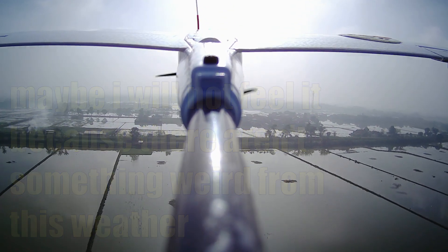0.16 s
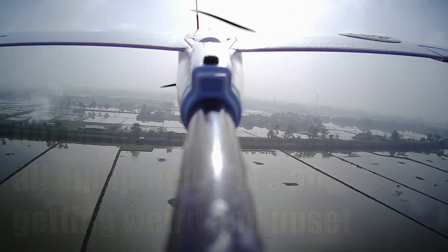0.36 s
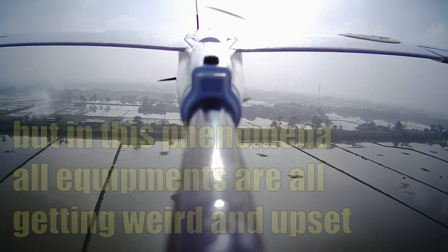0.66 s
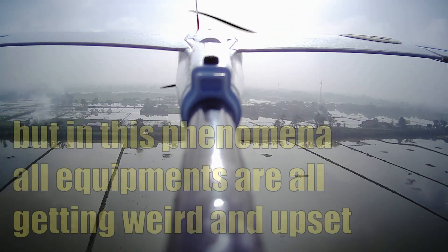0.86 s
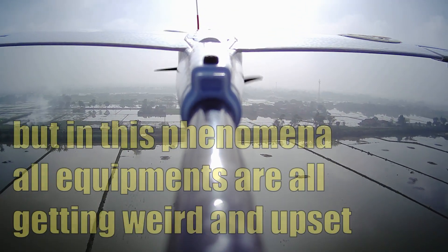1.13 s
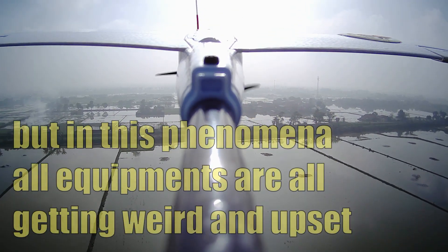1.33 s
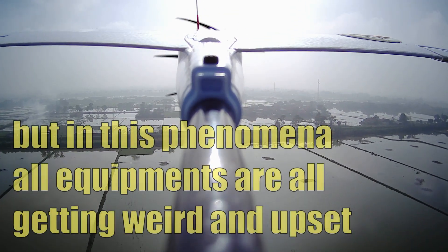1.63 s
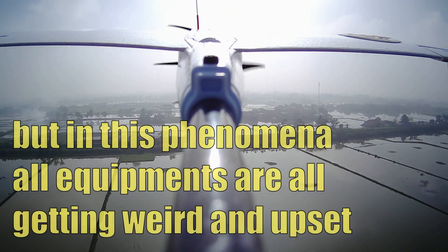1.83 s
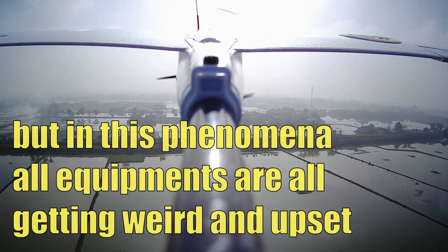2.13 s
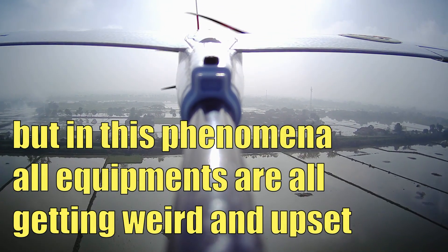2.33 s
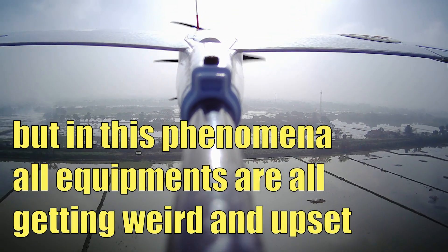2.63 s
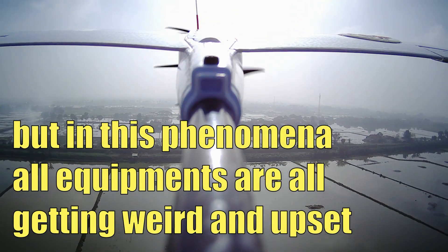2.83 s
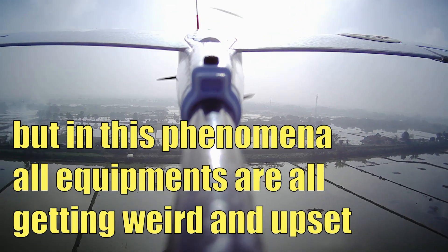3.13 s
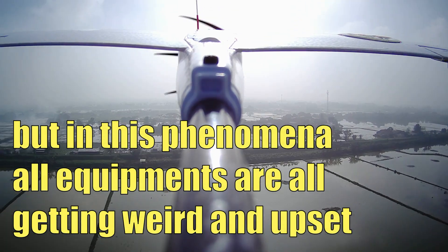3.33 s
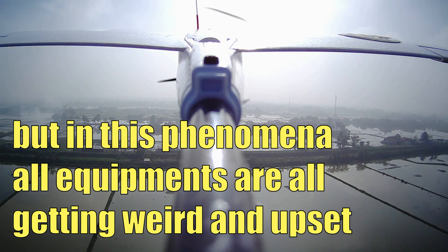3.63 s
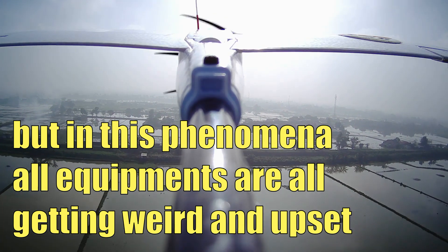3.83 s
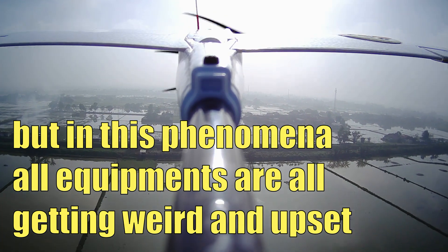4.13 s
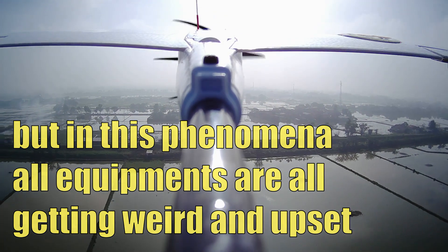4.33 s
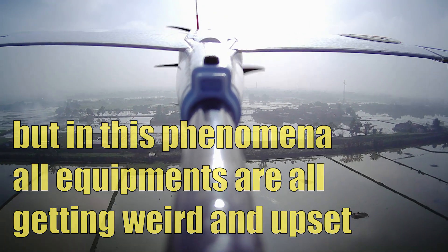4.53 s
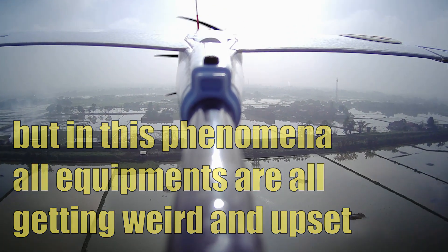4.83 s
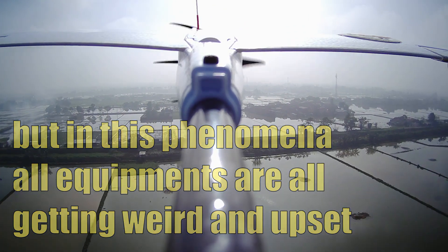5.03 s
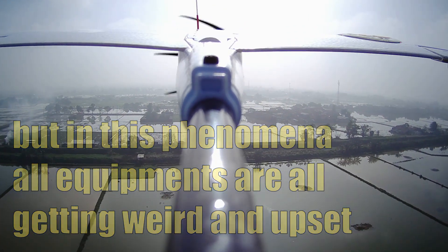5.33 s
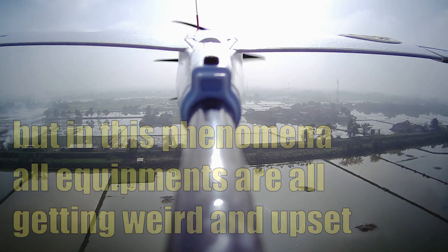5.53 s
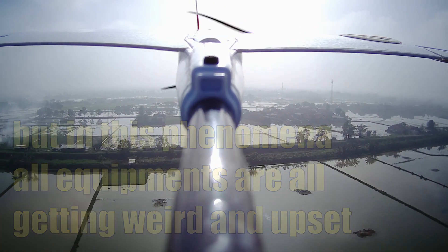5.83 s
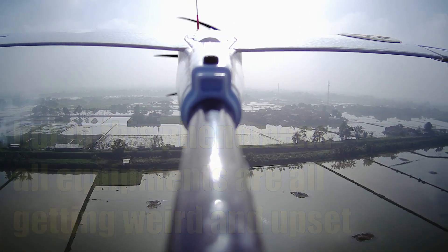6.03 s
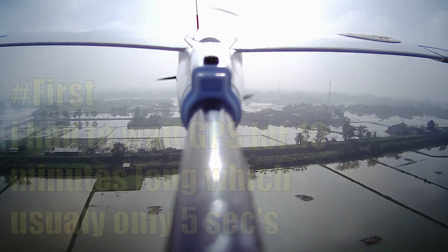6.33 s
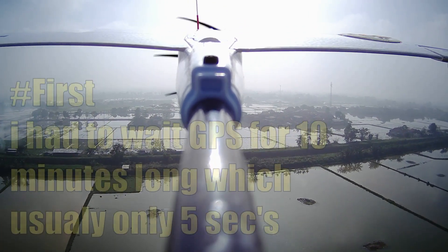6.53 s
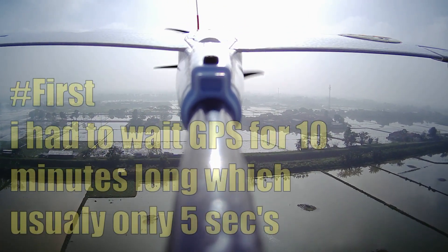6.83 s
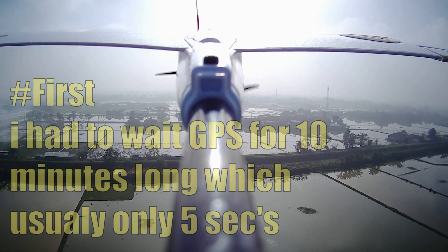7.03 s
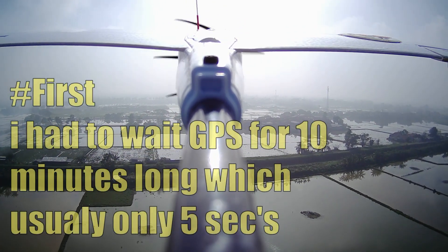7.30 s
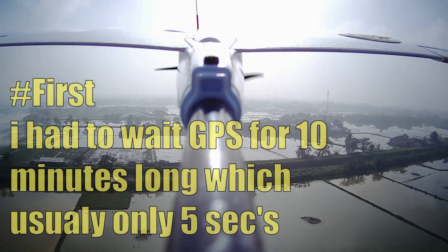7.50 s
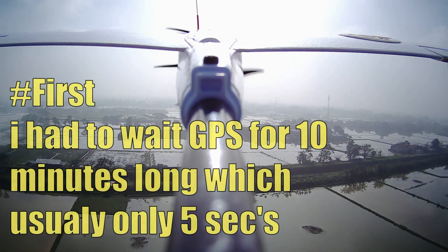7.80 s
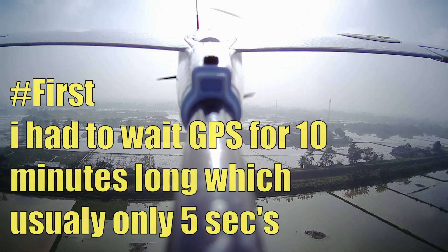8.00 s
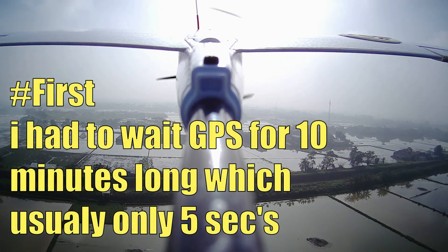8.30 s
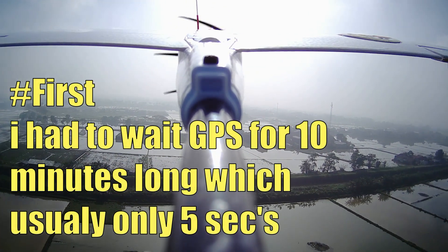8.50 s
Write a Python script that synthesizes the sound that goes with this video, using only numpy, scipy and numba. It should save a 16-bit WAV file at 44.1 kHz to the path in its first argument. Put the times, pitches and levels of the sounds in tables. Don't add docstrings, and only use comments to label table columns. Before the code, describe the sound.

Wind pours continuously over a small microphone fixed to the tail of an electric model aircraft in level flight. The rush is low-mid and muffled, fluttering unevenly, with irregular dull thumps and a few tiny cracks. Beneath it a faint motor hums and whines steadily, rising very slightly near the end. A thin treble hiss and a very high whistle stay in the background, with one small tick just past the middle.

```python
import sys
import numpy as np
from scipy import signal
from scipy.fft import rfft, irfft
from scipy.io import wavfile
from scipy.ndimage import uniform_filter1d
from numba import njit

SR = 44100
rng = np.random.default_rng(int(sys.argv[2]) if len(sys.argv) > 2 else 0)


def to_wav(s):
    ch = np.atleast_2d(s).T
    pcm = np.round(np.clip(ch, -1, 1) * 32767)
    wavfile.write(sys.argv[1], SR, pcm.astype(np.int16))


def level_to_linear(level):
    exponent = np.asarray(level, float) / 20
    return 10 ** exponent


N = 381906

# (frequency [Hz], level [dB])
WIND_COLOUR = [(15, -55), (25, -38), (113, -14.5), (141, -11), (176, -7.5), (293, 0), (427, 1), (521, -1),
               (1110, -14), (1480, -19), (1610, -19.5), (1730, -16.5), (2110, -17.5), (3070, -38.5),
               (5000, -55), (6500, -67), (11000, -120)]
# (time [s], rush level [dB])
AIRFLOW = [(0, -42.5), (.65, -41.5), (1.4, -40.5), (2.1, -39), (2.7, -40.5), (3.6, -41), (4.1, -40.5),
           (4.5, -42), (5.3, -41), (6.3, -40.5), (6.9, -40), (7.6, -40.5), (8.66, -40)]
# (time [s], tug peak [dB], push +1 or suction -1, swell of the rush [dB])
BIG_EDDIES = [(0.0963, -29.4, -1, 5), (0.1798, -23, -1, 2.5), (0.5592, -25, -1, 4.5), (0.5794, -31, -1, 2),
              (0.7207, -23, 1, -2.5), (0.946, -27, -1, .3), (1.0014, -26, -1, 2.5), (2.246, -31, -1, 2),
              (2.75, -27, -1, 1.8), (2.8955, -25, -1, 3), (2.9909, -20, 1, -0.5), (3.2027, -25, -1, 3),
              (3.286, -34, -1, 4), (4.1234, -28, -1, 2.5), (4.6854, -31, -1, 4), (4.807, -24, -1, 4),
              (4.8754, -28, -1, 3.5), (5.4053, -20, -1, 1.5), (5.5507, -28.2, -1, 2.5),
              (6.0017, -26, -1, 1), (6.0939, -23, 1, -1), (6.36, -27, 1, 1.5), (6.6827, -20, -1, 1),
              (6.9521, -19, -1, 2), (7.1093, -21, 1, 1), (7.4263, -22, -1, 2.5), (7.6808, -19, -1, 1.8),
              (8.1017, -26, -1, 2.5), (8.1687, -28.1, 1, 1.5), (8.3636, -29.7, 1, 1)]
# (time [s], change [dB])
WAKE_SWINGS = [(.065, -6.5), (.51, -0.5), (2.31, -5.5), (2.58, -0.5), (2.84, -2.5), (3.26, -4.5),
               (3.5, 0.5), (4.51, -6), (4.85, -1), (5.11, -2), (5.45, -3.5), (5.572, -4.5), (5.72, 2),
               (5.77, -2.5), (6.51, 0.5), (6.73, 1), (6.82, -5), (7.16, -4), (7.2, 2), (7.24, -5),
               (7.31, 2), (7.55, 1.5), (7.65, -3.5), (8.27, -3.5), (8.64, 0.5)]
# (time [s], change [dB], length [s])
EDGE_FLURRIES = [(.42, 3, .04), (.7, 3, 0.045), (.91, 1.7, 0.11), (1.33, -0.2, .06), (1.6, 1.5, .06),
                 (2.665, 2.5, .06), (3.21, 1, .04), (4.32, -2.5, 0.054), (4.5, 3.5, 0.17), (5, -1, .1),
                 (5.48, 1, 0.17), (5.9, 0.3, 0.084), (6.72, 1.3, 0.21), (7, -2.5, .03), (7.04, 2, 0.013),
                 (7.12, 4.5, 0.021), (7.72, 2, 0.062), (7.89, 1.8, .04), (7.98, 2, 0.023), (8.2, 2, 0.16)]
# (time [s], peak level [dB])
PORT_SNAPS = [
    (0.109, -34),
    (0.677, -42),
    (1.5697, -44),
    (6.1548, -51),
    (6.8427, -49),
    (7.4323, -38),
]
# (time [s], shaft speed [turns per s])
THROTTLE_MOVES = [
    (0, 146.93),
    (1.33, 149.33),
    (3.31, 146.6),
    (3.9, 146.87),
    (6.32, 149.35),
    (7.1, 151.55),
]
LINE_MULTIPLES = [1, 10.64, 10.73, 11, 12, 13, 16, 18.55, 42, 84]
# (rms level [dB], blur [Hz])
MOTOR_LINES = [(-56, 1.43), (-74, 4.2), (-66, 4.99), (-60, 1), (-82, 1.4), (-66, 6), (-78.5, 3), (-82, 25),
               (-87, 4), (-99, 4.6)]
# (frequency [Hz], width [Hz], rms level [dB], wander [Hz])
SHELL_RINGS = [(6124, 340, -71, 5), (7130, 60, -82.5, 32), (9700, 980, -75, 5), (10870, 430, -75, 5),
               (11900, 120, -95, 5), (12200, 150, -92, 5), (13000, 900, -83, 5)]
# (frequency [Hz], level [dB])
HISS_COLOUR = [(2500, 1.5), (4200, -0.5), (8000, -1.5), (12500, 0), (14200, 1), (15000, -2), (15700, -11)]
# (multiple of the picture rate, rms level [dB])
WHISTLE_TONES = [(-1, -95), (0, -71.5), (1, -85.5), (2, -92), (3, -96), (4, -97), (5, -97), (6, -99),
                 (7, -99), (8, -100), (10, -100), (12, -103), (-22, -99), (-24, -100), (-25, -99),
                 (9, -101), (14, -101), (15, -101), (16, -102)]

RUMBLE_DB, HISS_DB = -51.5, -69
PORT_DB, EDGE_DB = -56, -56
FOLLOW = 0.37
SWELL_S, WAKE_S = 0.026, 0.016
SPOOL_S, STICK_S = 0.075, 0.2
LOAD_DB_PER_HZ = 0.5
WHISTLE_HZ, PICTURE_HZ = 13366.9, 59.94
GAP_S, GAP_DB = 5.1283, -33.8


def level(x, db):
    return x * level_to_linear(db) / np.sqrt(np.mean(x ** 2))


def steady(x, db, span_s=0.057):
    k = int(span_s * SR)
    power = uniform_filter1d(uniform_filter1d(x ** 2, k), k)
    return x * level_to_linear(db) / np.sqrt(power)


def curve(table):
    s, *columns = np.transpose(table)
    return [np.interp(np.arange(N) / SR, s, c) for c in columns]


def walk(rate):
    k = max(int(SR / rate), 1)
    held = np.repeat(rng.standard_normal(N)[:N // k + 1], k)
    smooth = uniform_filter1d(uniform_filter1d(held, k), k)[:N]
    return smooth / np.std(smooth)


def bumps(rows):
    t = np.arange(N) / SR
    return sum(db * np.exp(-((t - at) / max(length, .005)) ** 2) for at, db, length in rows)


def colour(x, points):
    log_hz = np.log(np.arange(N // 2 + 1) * SR / N + 1)
    hz, db = np.transpose(points)
    return irfft(rfft(x) * level_to_linear(np.interp(log_hz, np.log(hz), db)), N)


@njit
def resonator(x, hz, width):
    y, b, l = np.empty(len(x)), 0., 0.
    for i in range(len(x)):
        g, k = np.tan(np.pi * hz[i] / SR), width / hz[i]
        v = (b + g * (x[i] - l)) / (1 + g * (g + k))
        b, l, y[i] = 2 * v - b, l + 2 * g * v, k * v
    return y


def gusts():
    flow = curve(AIRFLOW)[0]
    swells = [(at, swell, SWELL_S) for at, _, _, swell in BIG_EDDIES]
    swings = [(at, db, WAKE_S) for at, db in WAKE_SWINGS]
    rush = flow + bumps(swells + swings) + .3 * walk(rate=30.)
    bright = FOLLOW * (flow + 41) + bumps(EDGE_FLURRIES)
    port = PORT_DB + bright + 0.53 * walk(rate=28.)
    edge = EDGE_DB + bright + 0.78 * walk(rate=32.)
    return rush, port, edge


def wind(rush_db, port_db, edge_db):
    burst = walk(rate=260.)
    large = rng.standard_normal(N) * level_to_linear(0.97 * burst + 0.21 * walk(rate=22.))
    middle = rng.standard_normal(N) * level_to_linear(1.35 * burst + 0.54 * walk(rate=100.))
    small = rng.standard_normal(N) * level_to_linear(1.5 * burst + 0.8 * walk(rate=150.) + 0.35 * walk(rate=25.))

    rumble = colour(colour(rng.standard_normal(N), WIND_COLOUR), [(170, -7.5), (230, -16), (300, -75)])
    rush = colour(colour(large, WIND_COLOUR),
                  [(120, -76), (170, -16), (215, -1.5), (880, -2.5), (1100, -8.5), (1600, -68)])
    port = colour(colour(middle, WIND_COLOUR),
                  [(650, -67), (850, -21.5), (1030, -9), (1600, -3.5), (1850, -31), (2400, -70)])
    edge = colour(colour(small, WIND_COLOUR), [(1100, -74), (1450, -20), (1680, -8)])

    out = level(rumble, RUMBLE_DB) + steady(rush, rush_db - 0.84)
    return out + steady(port, port_db + 1.25) + steady(edge, edge_db + .3)


def slaps():
    tugs = (rng.random(N) < 120 / SR) * (rng.standard_normal(N) - .9) * level_to_linear(-39.5)
    tugs += (rng.random(N) < 4.5 / SR) * np.sign(rng.random(N) - .7) * level_to_linear(-35.5)
    for at, db, side, _ in BIG_EDDIES:
        tugs[int(at * SR)] = np.sign(side) * level_to_linear(db - 5)
    duller = [(800, -1), (1500, -5), (4000, 0)]
    one_tug_peak = colour(colour(np.arange(N) == 0, WIND_COLOUR), duller)[0]
    return colour(colour(tugs, WIND_COLOUR), duller) / one_tug_peak


def snaps():
    out, s = np.zeros(N), np.arange(400) / SR
    ring = np.sin(2 * np.pi * 2000 * s) * (1 - np.exp(-s / .00015)) * np.exp(-s / 0.00096)
    for at, db in PORT_SNAPS:
        out[int((at + .0016) * SR):][:400] += level_to_linear(db) * ring
    return out


def shaft():
    s, hz = np.transpose(THROTTLE_MOVES)
    setting = np.searchsorted(s, np.arange(N) / SR, side="right") - 1
    wanted = uniform_filter1d(hz[setting] - hz[0], int(STICK_S * SR))
    keep = np.exp(-1 / (SPOOL_S * SR))
    speed = hz[0] + signal.lfilter([1 - keep], [1, -keep], wanted)
    return np.cumsum(speed) / SR


def motor(turns):
    out = 0
    load_db = LOAD_DB_PER_HZ * (np.gradient(turns) * SR - THROTTLE_MOVES[1][1])
    for multiple, (db, blur_hz) in zip(LINE_MULTIPLES, MOTOR_LINES):
        drift = np.cumsum(blur_hz * walk(rate=25.)) / SR
        is_bearing = multiple % 1 > 0
        sway_db = 0.85 * walk(rate=6.) + load_db * is_bearing
        out = out + level(np.sin(2 * np.pi * (multiple * turns + drift)) * level_to_linear(sway_db), db)
    return out


def gap_tick():
    out, s = np.zeros(N), np.arange(400) / SR
    start = int(GAP_S * SR)
    out[start - 12:start] -= .4 * level_to_linear(GAP_DB) * np.linspace(0, 1, num=12)
    out[start:][:400] += .6 * level_to_linear(GAP_DB) * np.exp(-s / .0002)
    return out


def shell(turns):
    blades = 1 + .17 * np.cos(4 * np.pi * turns) + .12 * np.cos(2 * np.pi * turns + .8)
    push = blades * level_to_linear(.5 * walk(rate=100.))
    rings = 0
    for hz, width, db, wander_hz in SHELL_RINGS:
        pitch = hz + wander_hz * walk(rate=2.5)
        rings = rings + level(resonator(push * rng.standard_normal(N), pitch, 1. * width), db)
    hiss = level(colour(rng.standard_normal(N), HISS_COLOUR), HISS_DB)
    return colour(rings, HISS_COLOUR) + hiss


def whistle():
    s = np.arange(N) / SR
    s = s + (s > GAP_S) * .002125
    turn = np.pi / 2
    out = 0
    for k, db in WHISTLE_TONES:
        phase = 2 * np.pi * (WHISTLE_HZ + k * PICTURE_HZ) * s + turn * k * k
        out = out + level(np.sin(phase), db)
    return out


def scene():
    turns = shaft()
    air = wind(*gusts()) + slaps() + snaps()
    return (air + motor(turns) + gap_tick() + shell(turns) + whistle())[None]


def roll_off(x):
    return signal.sosfilt(signal.butter(12, 15700, fs=SR, output="sos"), x)


def record(dry):
    top = level_to_linear(-18)
    mix = top * np.tanh(dry / top)
    return roll_off(mix)


dry = scene()
out = record(dry)
to_wav(out)
```